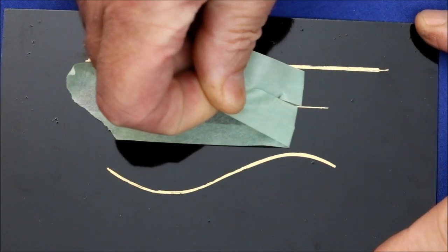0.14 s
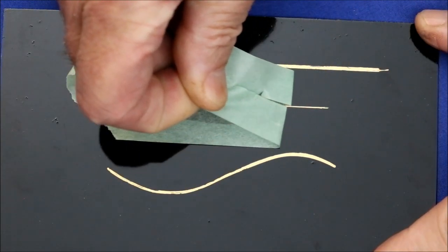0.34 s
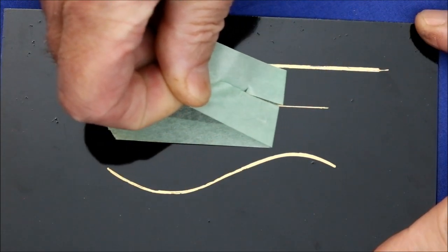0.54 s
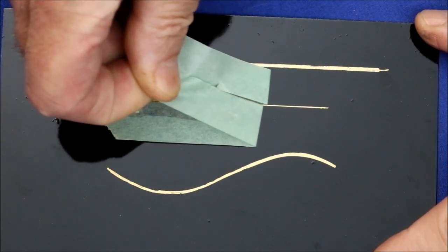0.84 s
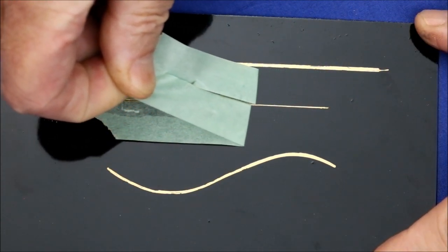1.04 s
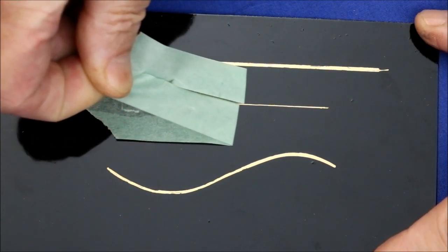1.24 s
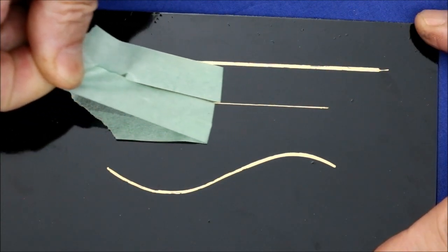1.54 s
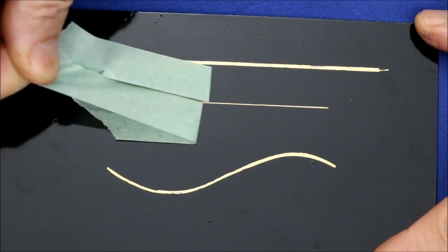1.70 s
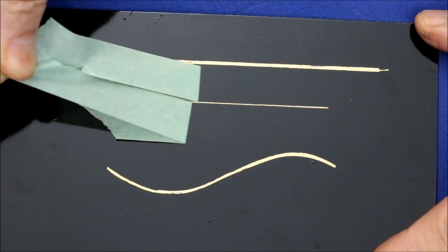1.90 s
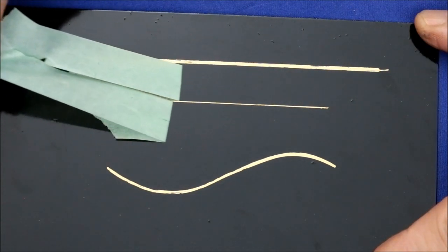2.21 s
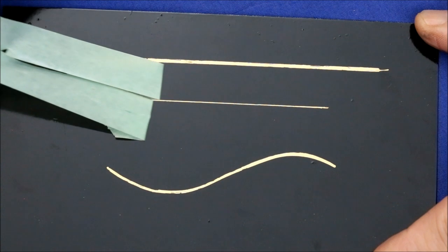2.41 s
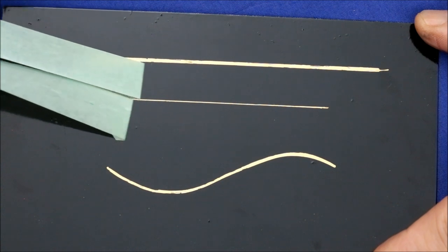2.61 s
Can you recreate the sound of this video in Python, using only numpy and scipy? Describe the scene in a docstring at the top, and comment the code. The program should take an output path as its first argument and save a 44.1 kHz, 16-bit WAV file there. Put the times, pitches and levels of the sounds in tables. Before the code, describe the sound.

Masking tape peels by hand from a glossy panel in a fine dense crackle, with a dull low rustle, small ticks and four sharp snaps, heard close in a quiet workshop with faint hiss.

```python
"""Masking tape off a glossy panel

A quiet workshop, the panel lying on a bench, the tape pulled slowly and heard close.
Glue threads let go in a fine dense crackle of tiny rings; the panel adds a dull low noisy rustle.
Small creases tick as one short ring or a quick burst of several; four times the tape snaps and rings
its modes, the last with a strong early echo. Faint early echoes and a short tail answer from the room,
over steady room tone and microphone hiss."""
import sys
import numpy as np
from scipy import signal
from scipy.fft import rfft, irfft
from scipy.io import wavfile

SR = 44100
rng = np.random.default_rng(int(sys.argv[2]) if len(sys.argv) > 2 else 0)


def store_pcm(level_fs):
    """Save levels as 16-bit WAV."""
    pcm = np.round(np.clip(level_fs, -1, 1) * 32767).astype(np.int16)
    wavfile.write(sys.argv[1], SR, np.atleast_2d(pcm).T)


def level_to_linear(level):
    """Convert decibel levels to linear amplitude factors, elementwise."""
    exponent = np.asarray(level, float) / 20
    return 10 ** exponent


N = 121275  # samples, 2.75 s


def rms_one(x):
    """Scales a signal to rms 1."""
    return x / np.sqrt(np.mean(x ** 2) + 1e-20)


def at_hz(points, hz):
    """Reads a (f/Hz, level/dB) curve along log frequency."""
    point_hz, point_db = np.transpose(points)
    return np.interp(np.log(hz), np.log(point_hz), point_db)


def drift(rate_hz):
    """Slow chance of rms about 1: noise through two equal low-pass poles at rate_hz."""
    hop = 40  # samples between slow values
    pole = np.exp(-2 * np.pi * rate_hz * hop / SR)
    noise = rng.standard_normal(N // hop + 2002)
    slow = signal.lfilter([1], [1, -2 * pole, pole * pole], noise)[2000:]  # settled part
    return np.interp(np.arange(N) / hop, np.arange(len(slow)), rms_one(slow))


def ring(clicks, hz, t60):
    """A damped resonance: a unit click starts a sine of height 1 that falls 60 dB in t60 seconds."""
    radius = level_to_linear(-60 / (t60 * SR))
    angle = 2 * np.pi * hz / SR
    poles = [1, -2 * radius * np.cos(angle), radius * radius]
    return signal.lfilter([np.sin(angle)], poles, clicks + 1e-18)


def coloured(spectrum):
    """Noise of rms 1 shaped to the given dB per Hz."""
    hz = np.maximum(np.arange(N // 2 + 1) * SR / N, 1)
    shaped = rfft(rng.standard_normal(N)) * level_to_linear(at_hz(spectrum, hz))
    return rms_one(irfft(shaped, N))


# course of the pull: t/s, crackle level/dB, level of its treble/dB, panel rustle level/dB before its drift
PULL = [(0, -53, -2.5, -85), (.08, -49.5, 0, -89), (.18, -54, -4, -70), (.32, -51, -1, -66.5),
        (.48, -51.5, -1, -70), (.56, -57.5, -1, -74), (.74, -52, -3, -60.5), (.95, -54, -3.5, -58),
        (1.15, -55.5, -1.5, -64), (1.33, -53.5, -2, -61), (1.47, -50.5, -1, -58), (1.58, -57, -3, -66),
        (1.68, -63, 3, -70.5), (1.95, -63.5, 6, -70), (2.15, -58, 6, -65), (2.3, -52.5, 4.5, -57.5),
        (2.45, -54.5, 4.5, -57.5), (2.56, -54.5, 5, -59), (2.64, -58, 4, -70.5), (2.75, -57.5, 3.5, -62)]
# colour of the breaking glue: f/Hz, relative level/dB per Hz
GLUE_COLOUR = [(900, -17), (2000, -11.5), (3300, -6.5), (4300, -6.5), (5000, -3.5), (5700, -0.5),
               (6600, -3.5), (7200, -7.5), (8900, -8), (9400, -16), (12000, -12), (15500, -16.5)]
# colour of the rustling panel: f/Hz, relative level/dB per Hz
PANEL_COLOUR = [(60, -29), (150, -7), (300, -6), (360, 0.5), (450, 2), (530, -5), (1000, -10),
                (1600, -28.5)]


def peel():
    """Glue threads break in clumps, each a tiny ring; the pull also rustles the panel."""
    t, *columns = np.transpose(PULL)
    crackle_db, treble_db, rustle_db = [np.interp(np.arange(N) / SR, t, c) for c in columns]
    size_db = 1.8 * np.minimum(rng.exponential(1, N), 5)
    sizes = level_to_linear(size_db) * rng.choice([-1, 1], N)
    slips_per_s = 20000 * level_to_linear(0.8 * drift(25))  # clumps
    slips = sizes * (rng.random(N) < slips_per_s / SR)

    pitches = np.geomspace(900, 15500, 56)  # Hz
    dealt = rng.integers(0, len(pitches), N)  # each slip gets one pitch
    rings = []
    for k, hz in enumerate(pitches):
        tiny = ring(slips * (dealt == k), hz, 22 / hz)  # 60 dB down in 22 cycles
        rings.append(level_to_linear(at_hz(GLUE_COLOUR, hz)) * hz * tiny)  # hz offsets shorter rings, wider spacing
    rings = np.array(rings) / np.std(np.sum(rings, axis=0))

    top = pitches > 9200
    treble = (pitches > 7000) & ~top
    crackle = rings[~treble & ~top].sum(axis=0)
    crackle = crackle + level_to_linear(treble_db) * rings[treble].sum(axis=0)
    crackle = crackle + level_to_linear(1.1 * treble_db) * rings[top].sum(axis=0)  # the top swings a little more
    rustle = level_to_linear(rustle_db + 1.3 * drift(19)) * coloured(PANEL_COLOUR)
    return level_to_linear(crackle_db) * crackle + rustle


# bench and near surfaces: delay t/s, level/dB before the band filter, smear t/s
NEAR_SURFACES = [(.0015, -17, .002), (.0087, -22, .0007), (.0172, -28, .002), (.0235, -31, .003)]


def workshop(tape):
    """A few smeared early echoes, then a diffuse tail, nearly the same on the two sides."""
    t = np.arange(SR // 2) / SR
    tail_start_s, tail_t60_s, tail_db = 0.023, 0.16, -22  # level before the band filter
    tail = level_to_linear(-60 * t / tail_t60_s) * np.clip(t / tail_start_s - 1, 0, 1)
    shape = level_to_linear(tail_db) * tail / np.sqrt(np.sum(tail ** 2))
    for delay, db, smear in NEAR_SURFACES:
        puff = (t >= delay) * np.exp(-np.maximum(t - delay, 0) / smear)
        shape = shape + level_to_linear(db) * puff / np.sqrt(np.sum(puff ** 2))
    mid, side = rng.standard_normal((2, len(t))) * shape
    side = 0.022 * side
    band = signal.butter(1, (1800, 8400), "band", fs=SR, output="sos")
    reply = signal.sosfilt(band, [mid + side, mid - side])
    return signal.fftconvolve(tape[None], reply, axes=1)[:, :N]


def near_reflection(tape):
    """A near reflection reaches the two sides unequally: a faint late copy, opposite left and right."""
    lag_s = 0.00013
    late = np.interp(np.arange(N) - lag_s * SR, np.arange(N), tape)
    return level_to_linear(-29) * late * [[1], [-1]]


# room tone and microphone hiss: f/Hz, relative level/dB per Hz
ROOM_TONE = [(20, -17), (40, -5.5), (90, -1), (300, -4), (1100, -6.5), (2300, -10), (5000, -9.5),
             (9000, -15.5), (13000, -13.5), (16000, -20.5)]
# tilt of the left-right difference against the middle: f/Hz, level/dB (only its shape counts)
SIDE_TILT = [(40, -18), (200, -21), (500, -19.5), (1000, -23.5), (4000, -23.5), (8000, -16), (12000, -13),
             (16000, -7.5)]


def air():
    """Steady shaped noise in the middle, with a fainter one opposite on the two sides."""
    mid = level_to_linear(-56.5) * coloured(ROOM_TONE)
    side_colour = [(hz, db + at_hz(ROOM_TONE, hz)) for hz, db in SIDE_TILT]
    side = level_to_linear(-69) * coloured(side_colour)
    return mid + side * [[1], [-1]]


# small creases, and last the strong early echo of the fourth snap:
# t/s, starting level/dB, f/Hz, cycles of ring until 60 dB down
TICK_RINGS = [(0.2110, -32, 2900, 3.8), (0.2283, -35, 2310, 9.2), (0.655, -31, 12800, 11),
              (0.733, -40, 900, 5.5), (0.7665, -40, 6000, 5), (0.8143, -33, 7000, 4),
              (1.2803, -29, 3000, 3), (1.2817, -36, 1900, 4.6), (1.2826, -43, 4200, 4),
              (1.4605, -29, 3500, 2.9), (1.462, -37, 1700, 4.5), (1.491, -34, 5400, 3),
              (1.5135, -35, 4500, 3), (2.4934, -33, 6300, 7)]


def ticks():
    """Small creases, one short ring or a quick burst of several, and the fourth snap's early echo."""
    out = 0
    for t, db, hz, cycles in TICK_RINGS:
        click = np.zeros(N)
        click[int(t * SR)] = level_to_linear(db)
        out = out + ring(click, hz, cycles / hz)
    return out


# snaps: main slip t/s, share of the lead-in slip (minus: pulls the other way),
# gap to the second slip t/ms, share of the second slip
SNAP_SLIPS = [(0.2307, .12, .97, .25), (1.5959, -.3, .87, .25), (2.3246, -.05, .365, .7),
              (2.4841, -.1, .9, .9)]
# one row a snap: level/dB added in each mode group, low to high
SNAP_STRENGTHS = [(-3.5, -5, -12, -6, -4, -9, -3.5, -11), (-9, -17, -7, -9, -14, -9.5, -9, -10),
                  (-15, -28, -24, -11.5, -19, -20, -22.5, -20), (-12, -1, -9, -12, -16, -19, -17.5, -17.5)]
# edges between those mode groups: f/Hz
MODE_GROUP_EDGES = [300, 550, 1000, 2100, 4000, 5300, 7500]
# one row a snap: pitch factor from the tape's tension, left minus right level/dB
SNAP_PLACES = [(1.06, 0.1), (1.0, 0.1), (1.01, -1.0), (1.06, 0.1)]
# modes of the taut tape and panel: f/Hz, base level/dB, t60 t/s
TAPE_MODES = [(112, -33.5, 0.017), (430, -31, .05), (715, -22, 0.022), (1194, -15.5, 0.0093),
              (1700, -15, 0.0087), (2630, -11, 0.0068), (3600, -12, 0.008), (4620, 0, 0.0029),
              (5690, 3.5, 0.0021), (6930, 0, 0.0023), (8190, -2, 0.0032), (10160, -2, 0.002),
              (11440, -2, 0.0014), (14500, -6, 0.001)]


def snaps():
    """A snap is a weak lead-in, the main slip and a second one right after; all ring the tape's modes."""
    out = 0
    chance_db = rng.standard_normal((len(SNAP_SLIPS), len(TAPE_MODES)))  # spread 1 dB
    rows = zip(SNAP_SLIPS, SNAP_STRENGTHS, SNAP_PLACES, chance_db)
    for (t, lead, gap_ms, second), strengths, (tension, pan_db), luck_db in rows:
        clicks = np.zeros(N)
        slip_s = np.array([t - 0.00038, t, t + gap_ms / 1000])
        clicks[(slip_s * SR).astype(int)] = lead, 1, second
        snap = 0
        for k, (hz, mode_db, t60) in enumerate(TAPE_MODES):
            db = mode_db + strengths[np.searchsorted(MODE_GROUP_EDGES, hz)] + luck_db[k]
            pitch = hz * tension if hz > 4000 else hz  # lower modes keep their pitch
            snap = snap + (-1) ** k * level_to_linear(db) * ring(clicks, pitch, t60)
        out = out + snap * level_to_linear([[pan_db / 2], [-pan_db / 2]])
    return out


def scene():
    """Peel, ticks and snaps, with their reflections in the workshop and the air around them."""
    placed = peel() + ticks() + snaps()
    tape = placed.mean(axis=0)
    return placed + workshop(tape) + near_reflection(tape) + air()


def top_cut(x):
    """Nothing passes above the cut-off."""
    return signal.sosfilt(signal.butter(12, 17140, fs=SR, output="sos"), x)


def record(dry):
    """A steep low-pass cuts the top above 15650 Hz."""
    low_pass = signal.ellip(10, .3, 70, 15650, fs=SR, output="sos")
    mix = signal.sosfilt(low_pass, dry)
    return top_cut(mix)


dry = scene()
out = record(dry)
store_pcm(out)
```